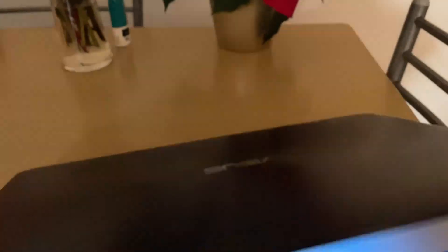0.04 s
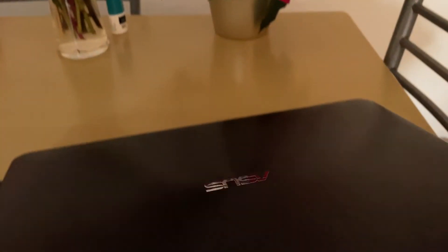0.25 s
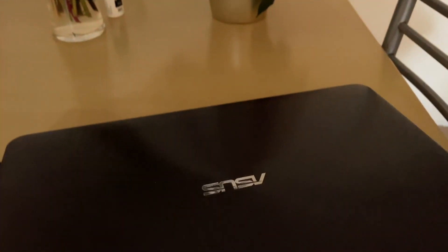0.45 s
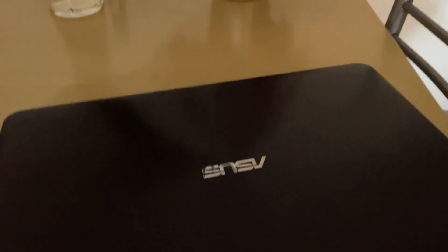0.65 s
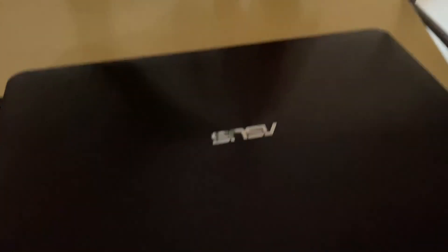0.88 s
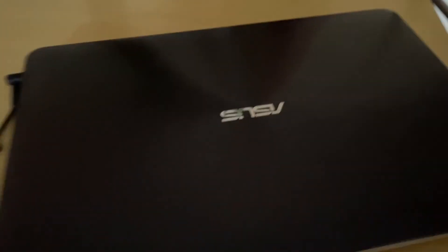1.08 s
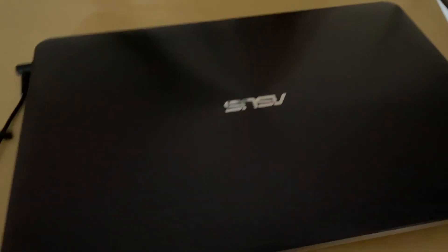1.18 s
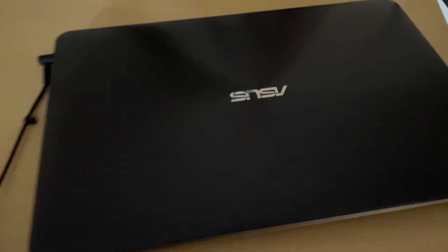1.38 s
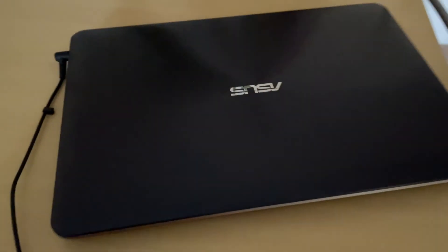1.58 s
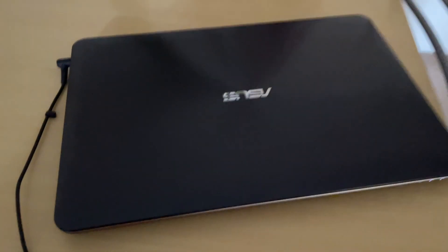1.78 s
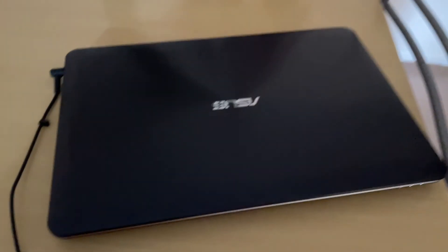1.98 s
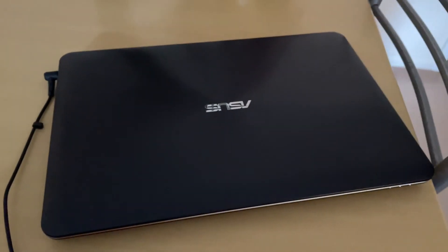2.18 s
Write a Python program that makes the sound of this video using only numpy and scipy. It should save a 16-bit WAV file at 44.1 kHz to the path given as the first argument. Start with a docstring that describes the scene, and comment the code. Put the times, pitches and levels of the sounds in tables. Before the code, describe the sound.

A laptop lid closes with a sharp, hollow plastic clack at about 0.47 seconds, its edge touching just before the main slap. A very faint hinge rub comes before it. The case rings briefly, the wooden table gives a low thud, and a short room reverberation fades by about 0.8. Soft, dull bumps and light brushes of handling continue to about 2.2 seconds over low room rumble, wavering hum and faint hiss.

```python
"""In a quiet room, a plastic laptop lid is lowered by hand and shuts on its base, on a wooden table.
One edge touches first, and the rest of the rim slaps down about a hundredth of a second later.
Short noise bursts make the rim contacts; dying sine waves make the panel, the case and the table ring.
A dull echo and fading noise are the room's answer. The hinge, the hand, a low rumble and a faint hiss
are shaped noise, and a few narrow hums waver in the background."""
import sys
import numpy as np
from scipy import signal
from scipy.fft import rfft, irfft
from scipy.io import wavfile

SR = 44100
rng = np.random.default_rng(int(sys.argv[2]) if len(sys.argv) > 2 else 0)


def store_pcm(level_fs):
    """Save levels as 16-bit WAV."""
    pcm = np.round(np.clip(level_fs, -1, 1) * 32767).astype(np.int16)
    wavfile.write(sys.argv[1], SR, np.atleast_2d(pcm).T)


N = 98475
TIME = np.arange(N) / SR  # seconds
FREQ = np.arange(N // 2 + 1) * SR / N  # Hz
SLAP_S = 0.4805  # the main blow

# how alike left and right are in the background and hand sounds: f/Hz, likeness (-1 to 1)
AIR_LIKENESS = [(30, 0.99), (100, 0.91), (300, 0.77), (700, .3), (1300, 0.6), (2400, .6), (4400, .45),
                (8000, -0.45), (13000, 0)]


def from_db(db):
    """Turn decibels into a gain."""
    return 10 ** (np.asarray(db) / 20)


def rms_one(x):
    """Scale a sound to an average strength (rms) of 1."""
    return x / np.sqrt(np.mean(x ** 2) + 1e-20)


def at_hz(points, hz):
    """Read between the points of a table, with frequency on a log scale."""
    f, value = np.transpose(points)
    return np.interp(np.log(hz), np.log(f), value)


def dying(start, t60, rise=1e-4):
    """Loudness curve of a blow: a quick rise, then a fade that loses 60 dB every t60 seconds."""
    age = np.maximum(TIME - start, 0)
    return (1 - np.exp(-age / rise)) * np.exp(-np.log(1000) * age / t60)


def noise(spectrum, likeness):
    """Stereo noise with a given colour; a shared part and an opposed part set the left-right likeness."""
    hz = np.maximum(FREQ, 1)
    shared, opposed = rfft(rng.standard_normal((2, N)))
    alike = np.clip(at_hz(likeness, hz), -.99, .99)
    both = np.sqrt(1 + alike) * shared + np.sqrt(1 - alike) * opposed * [[1], [-1]]
    colour = from_db(at_hz(spectrum, hz)) * (hz > 15)
    return rms_one(irfft(both * colour, N))


def narrow_noise(hz, width_hz):
    """Stereo noise in one narrow band; the second of two passes is kept, once the filter has settled."""
    edges = [hz - width_hz / 2, hz + width_hz / 2]
    band = signal.butter(2, edges, "band", fs=SR, output="sos")
    white = noise([(1, 0), (SR, 0)], AIR_LIKENESS)
    return rms_one(signal.sosfilt(band, np.hstack([white, white]))[:, N:])


def ring(modes, start, rise=1e-4):
    """A struck body rings as a sum of dying sine waves, every second one upside down."""
    age = np.maximum(TIME - start, 0)
    total = np.zeros(N)
    for k, (hz, db, t60) in enumerate(modes):
        tone = np.sin(2 * np.pi * hz * age) * dying(start, t60, rise)
        total += (-1) ** k * from_db(db) * tone
    return total


def panned(db):
    """Left and right gains: left is raised by db and right lowered by db."""
    return from_db(db * np.array([[1], [-1]]))


def waver():
    """A slowly wandering gain: random levels 6.7 times a second, joined by straight lines in dB."""
    knots = rng.standard_normal(64)
    return from_db(2.5 * np.interp(TIME * 6.7, np.arange(len(knots)), knots))


def room_tone():
    """Steady noise gives the rumble and hiss; narrow bands of noise give the wavering hums."""
    # colour of the steady noise: f/Hz, relative level per Hz/dB
    air_colour = [(16, -27), (25, -8.5), (36, 0.5), (55, -2.5), (118, -5.5), (165, -4), (229, -6.5),
                  (263, -11.5), (302, -9), (366, -15), (432, -12.5), (554, -23), (1020, -29.5), (1270, -27),
                  (1710, -38.5), (1970, -33.5), (2320, -42), (3420, -43.5), (4140, -48), (5500, -47),
                  (7190, -55), (9480, -50.5), (16000, -65)]
    # hums: f/Hz, width/Hz, level before wavering/dB
    hums = [(60.7, 10, -67.5), (147.2, 12, -67.5), (223.5, 14, -74), (299.3, 18.7, -70.5), (1903, 200, -90),
            (4105, 200, -94)]
    total = from_db(-58) * noise(air_colour, AIR_LIKENESS)
    for hz, width_hz, db in hums:
        total += from_db(db) * waver() * narrow_noise(hz, width_hz)
    return total


def hinge():
    """The hinge rubs softly while the lid moves: a band of noise that fades out as the lid lands."""
    stop_s, release_s = .47, 0.069
    moving = np.clip((stop_s - TIME) / release_s, 0, 1)
    return from_db(-71) * moving * narrow_noise(hz=1212, width_hz=390)


def handling():
    """Soft touches of hand and sleeve: short swells of dull noise (bumps) and brighter noise (brushes)."""
    # bumps: t/s, level/dB
    bump_times = [(0.191, -64), (0.789, -52), (0.900, -57), (1.021, -50), (1.420, -50), (1.488, -53),
                  (1.926, -51.5)]
    # colour of the bumps: f/Hz, relative level per Hz/dB
    bump_colour = [(30, -5.5), (60, 1.5), (150, -7), (300, -14), (700, -27), (2000, -43), (6000, -59)]
    # brushes: t/s, level/dB, rise/s, time to fade 60 dB/s
    brush_times = [(0.190, -64, .03, .3), (0.788, -65, 0.0017, 0.15), (1.168, -64, 0.0022, 0.22),
                   (1.345, -61.5, 0.013, 0.27), (1.410, -67.5, .01, 0.27), (1.610, -70, 0.013, 0.26),
                   (1.880, -67.5, 0.011, 0.15), (2.160, -70, 0.0095, 0.33)]
    # colour of the brushes: f/Hz, relative level per Hz/dB
    brush_colour = [(100, -4), (400, 2), (700, 4.5), (1400, -7), (2600, -18.5), (5000, -34), (7400, -34),
                    (10000, -33.5), (15500, -42)]
    bumps = sum(from_db(db) * dying(s, t60=0.16, rise=0.0027) for s, db in bump_times)
    brushes = sum(from_db(db) * dying(s, t60, rise) for s, db, rise, t60 in brush_times)
    return bumps * noise(bump_colour, AIR_LIKENESS) + brushes * noise(brush_colour, AIR_LIKENESS)


def rim_contacts():
    """Each time the rim meets the base, a sharp tick and a longer, dense plastic clack burst out."""
    # contacts: t/s, tick level/dB, clack level/dB
    contacts = [(0.4670, -30, -35.5), (0.4696, -33.5, -30.5), (0.4756, -51, -43.5), (0.4791, -21, -26),
                (0.4805, -44, -27.5)]
    # colour of the tick: f/Hz, relative level per Hz/dB
    tick_colour = [(500, -3), (1500, 5), (3000, 1), (4400, -12), (5700, -0.5), (6800, -24), (8000, -26),
                   (10000, -9), (12200, -11.5), (13200, -17), (15500, -20.5)]
    # colour of the shell's clack: f/Hz, relative level per Hz/dB
    clack_colour = [(100, -17), (400, 3), (1000, -4.5), (1800, -13), (3000, -11), (4500, -19.5),
                    (5700, -24.5), (7000, -36.5), (10000, -30), (15500, -36)]
    # how alike left and right are: f/Hz, likeness (-1 to 1)
    contact_likeness = [(200, 0.99), (700, .8), (1500, .6), (3000, .55), (6000, .6), (13000, .4)]
    tick_curve = sum(from_db(db) * dying(s, t60=0.0064) for s, db, _ in contacts)
    total = tick_curve * noise(tick_colour, contact_likeness)
    for s, _, db in contacts:
        total += from_db(db) * dying(s, t60=0.052) * noise(clack_colour, contact_likeness)
    return total


def case_ring():
    """The case is set ringing while the rim lands."""
    # ringing tones of the case: f/Hz, relative level/dB, time to fade 60 dB/s
    case_modes = [(422.7, 2, .075), (481, -2.5, .1), (577.5, -1, 0.09), (744.4, -4.5, .14),
                  (819, -16.5, 0.29), (886, -4, .08), (1027, -0.5, 0.084), (1078.5, -2.5, .09),
                  (1112, -6.5, 0.15), (1266, -6.5, .1), (1495, -5, 0.083), (1727, -16, 0.14),
                  (1904, -22.5, .08), (2076, -20, 0.15), (2343, -19, 0.14), (2474, -19, 0.1),
                  (2622, -11.5, .085), (2847, -17, .07), (3012, -16, .075), (3305, -14.5, 0.039),
                  (3818, -21, .07)]
    return from_db(-29) * ring(case_modes, start=0.4704, rise=0.0032)


def panel_flex():
    """The lid panel flexes once as it lands flat; its tones die quickly."""
    # tones of the panel: f/Hz, relative level/dB, time to fade 60 dB/s
    panel_modes = [(183.6, -7.5, .05), (323, -1.5, 0.045), (394, 1, .035), (690, -4.5, 0.024)]
    return from_db(-20.5) * ring(panel_modes, SLAP_S)


def table_thud():
    """The table top takes the main blow and booms at its own low tones."""
    # tones of the table: f/Hz, relative level/dB, time to fade 60 dB/s
    table_modes = [(63, 0, 0.29), (115.2, 4.5, .17), (147.6, -2.5, 0.42), (203.5, 1.5, 0.18),
                   (227.2, -14, 0.54), (333.5, -11.5, 1), (393, -8, 0.39)]
    return from_db(-36) * ring(table_modes, SLAP_S)


def right_late(x):
    """Sound reaches the right microphone 30 microseconds later; turning its phases delays it."""
    delay = np.exp(-2j * np.pi * FREQ * 3e-5)
    return np.array([x[0], irfft(rfft(x[1]) * delay, N)])


def wall_echo(slap):
    """The far wall sends the low part of the slap back once, the same on both sides."""
    delay_s, cutoff_hz = .040, 350
    low_pass = signal.butter(2, cutoff_hz, fs=SR, output="sos")
    dull = signal.sosfilt(low_pass, slap.mean(axis=0))
    return from_db(-11.5) * np.interp(TIME - delay_s, TIME, dull, left=0)


def room_tail():
    """Many blurred reflections of the slap, made from noise; each octave fades at its own rate."""
    # colour of the room's answer: f/Hz, relative level per Hz/dB
    tail_colour = [(50, -12), (150, 3), (400, 1), (700, -6), (1400, -13), (2800, -16), (4000, -21.5),
                   (5500, -22.5), (7400, -38), (10000, -32), (15500, -42)]
    # how long the room rings: f/Hz, time to fade 60 dB/s
    tail_t60 = [(60, 0.25), (300, 0.27), (1000, 0.33), (4000, 0.25), (9000, 0.24), (14000, 0.21)]
    # how alike left and right are: f/Hz, likeness (-1 to 1)
    tail_likeness = [(60, .6), (150, .85), (300, 0.92), (700, 0.069), (2500, 0.77), (6000, 0.29),
                     (9500, 0.19), (13000, 0.12)]
    wash = rfft(noise(tail_colour, tail_likeness))
    octave = np.round(np.log2(np.maximum(FREQ, 32)))
    total = np.zeros((2, N))
    for k in np.unique(octave):
        band = irfft(wash * (octave == k), N)
        total += band * dying(SLAP_S, at_hz(tail_t60, 2 ** k), rise=0.0045)
    return from_db(-34) * total


def scene():
    """The lid shuts on the table in the quiet room."""
    background = panned(0.52) * room_tone() + hinge() + handling()
    slap = rim_contacts() + case_ring() + panel_flex()
    direct = panned(1) * right_late(slap + table_thud())
    return background + direct + wall_echo(slap) + room_tail()


def record(dry):
    """A steep filter removes the treble above about 15900 Hz."""
    taps = signal.firwin(401, 15900, fs=SR, window="blackman")
    return signal.fftconvolve(dry, taps[None], mode="same", axes=1)


dry = scene()
out = record(dry)
store_pcm(out)
```